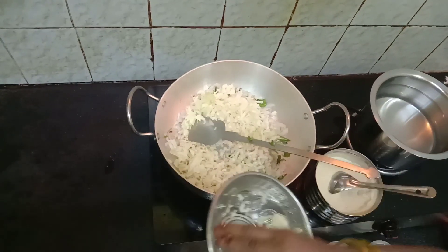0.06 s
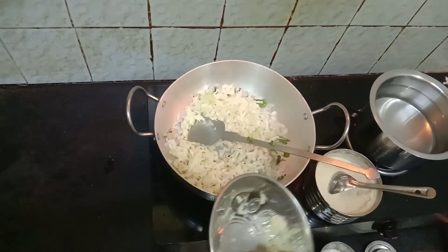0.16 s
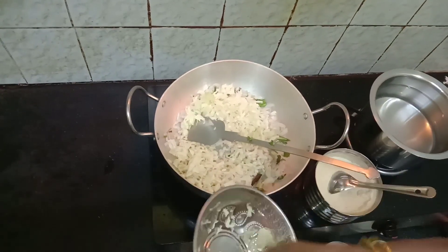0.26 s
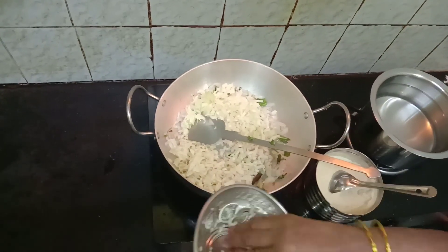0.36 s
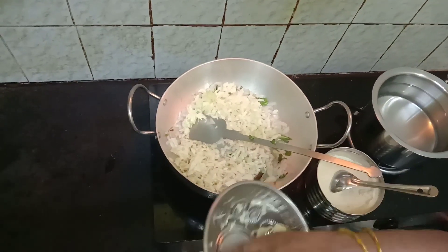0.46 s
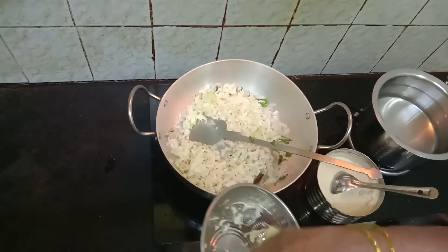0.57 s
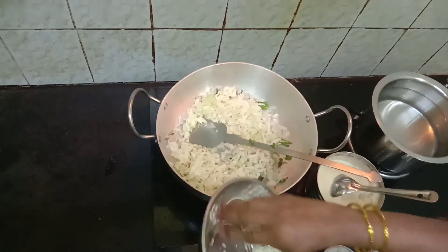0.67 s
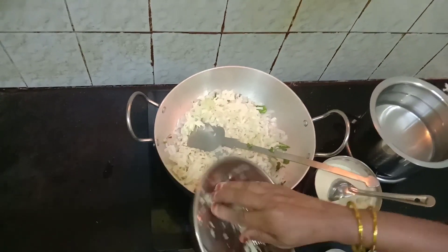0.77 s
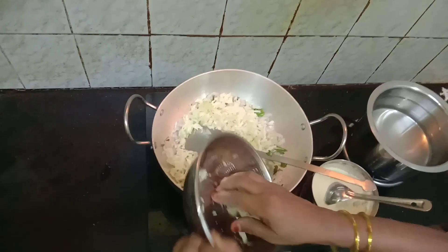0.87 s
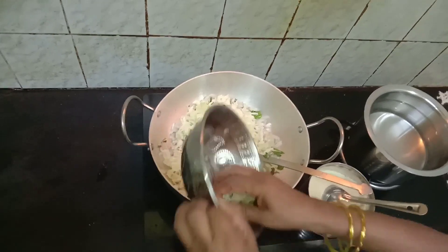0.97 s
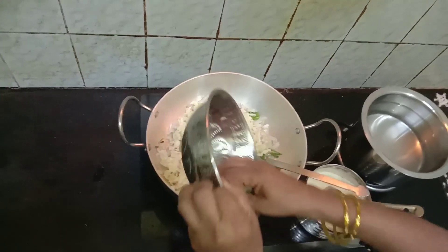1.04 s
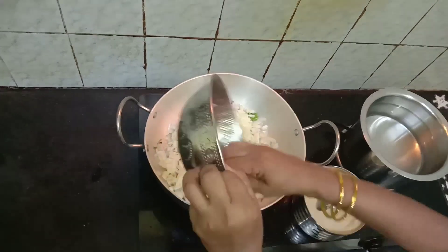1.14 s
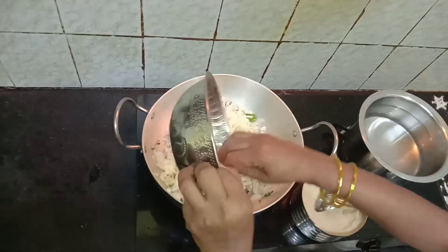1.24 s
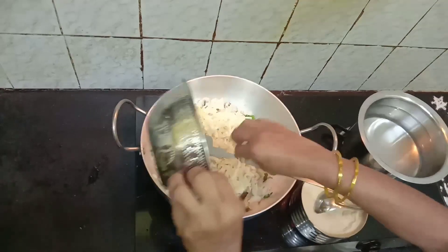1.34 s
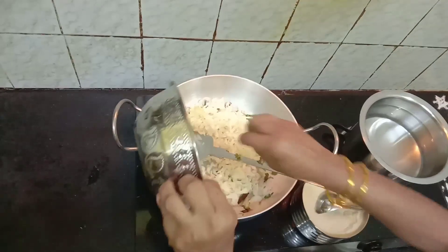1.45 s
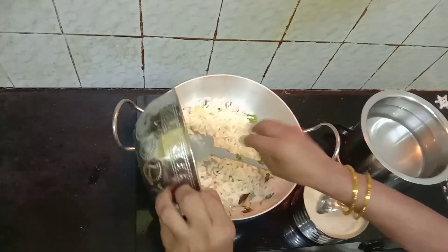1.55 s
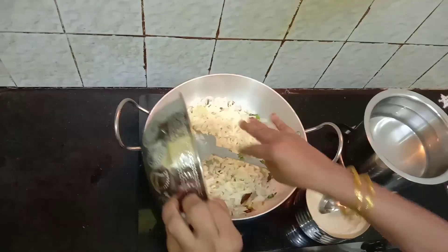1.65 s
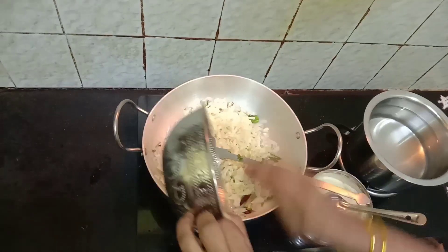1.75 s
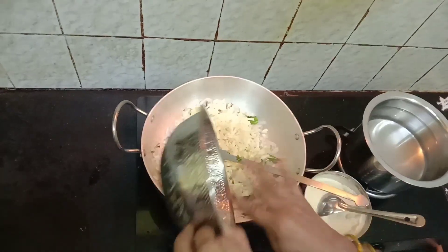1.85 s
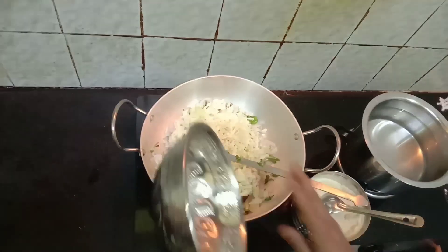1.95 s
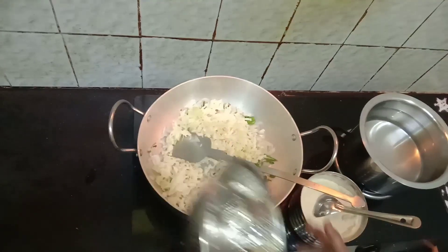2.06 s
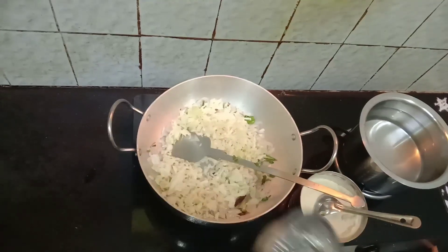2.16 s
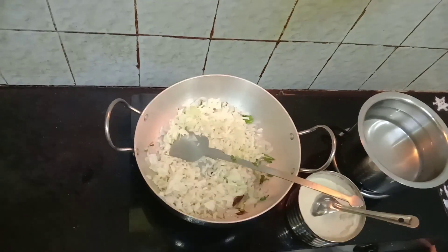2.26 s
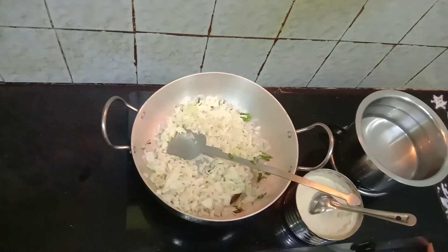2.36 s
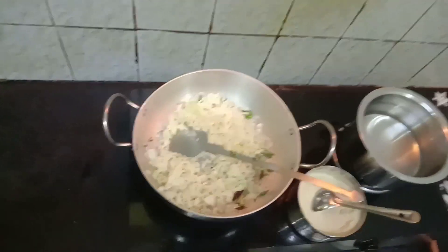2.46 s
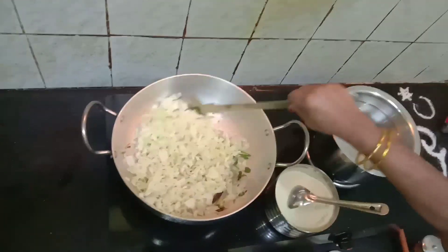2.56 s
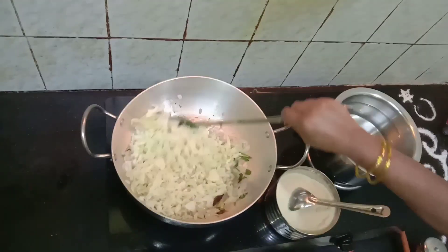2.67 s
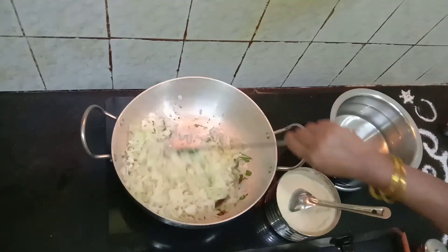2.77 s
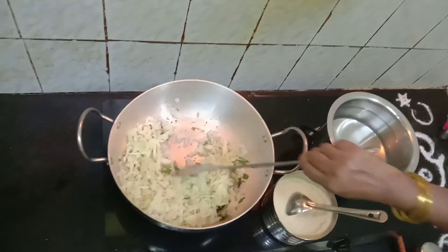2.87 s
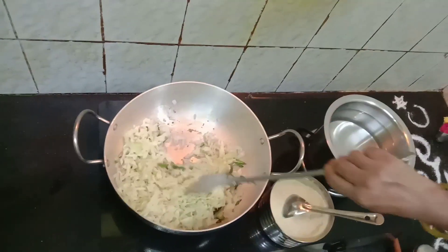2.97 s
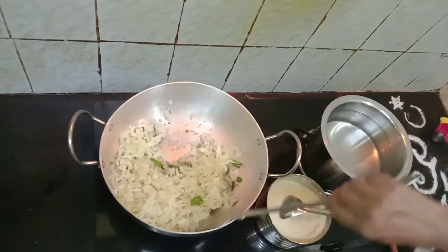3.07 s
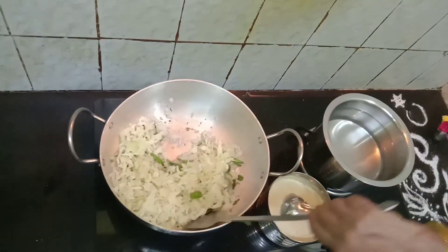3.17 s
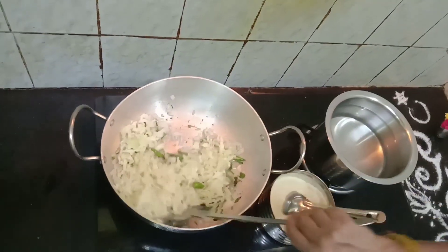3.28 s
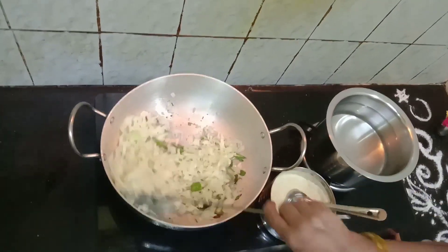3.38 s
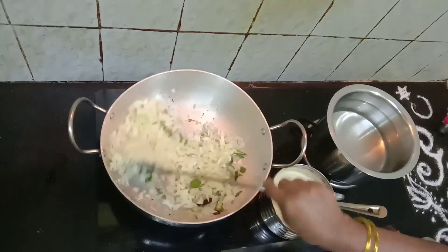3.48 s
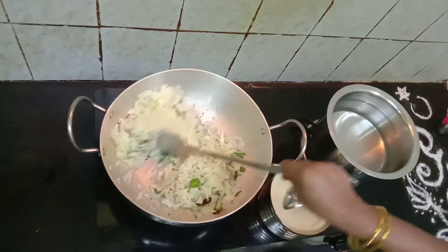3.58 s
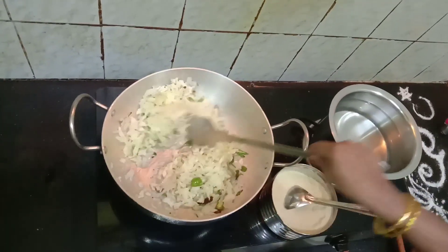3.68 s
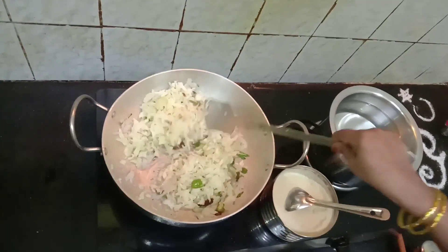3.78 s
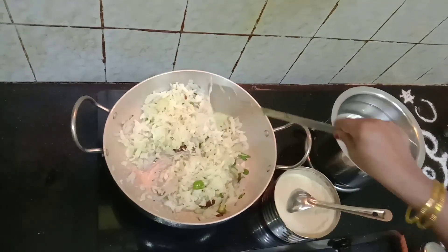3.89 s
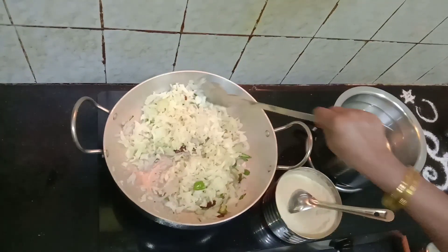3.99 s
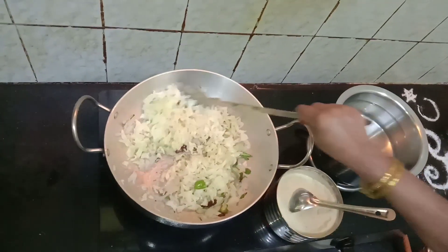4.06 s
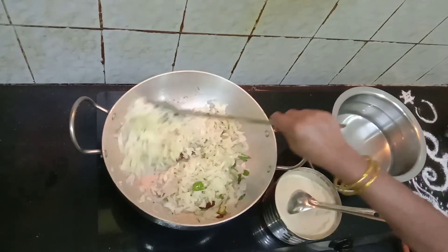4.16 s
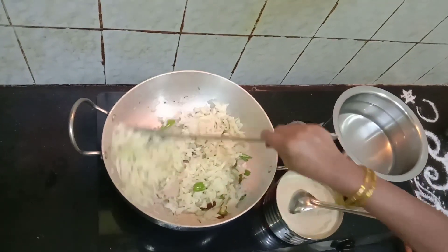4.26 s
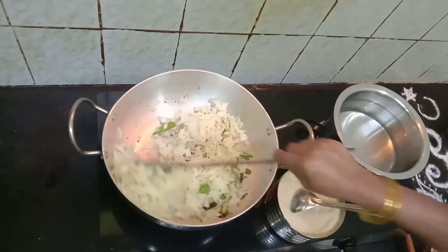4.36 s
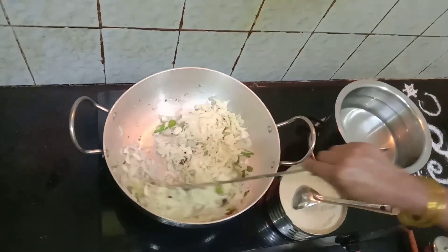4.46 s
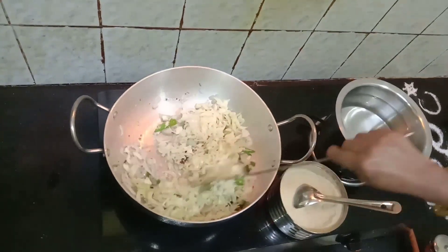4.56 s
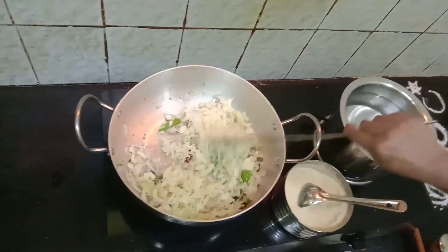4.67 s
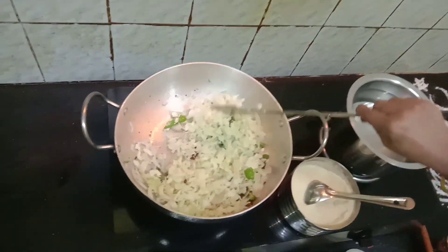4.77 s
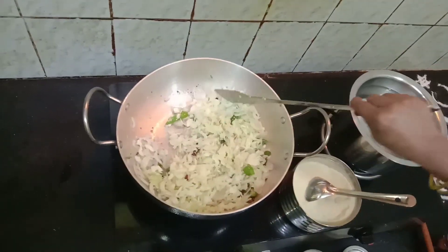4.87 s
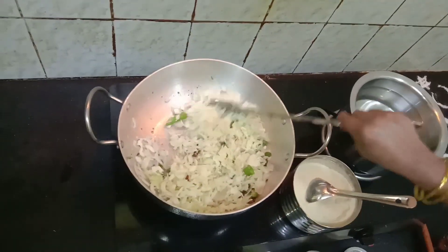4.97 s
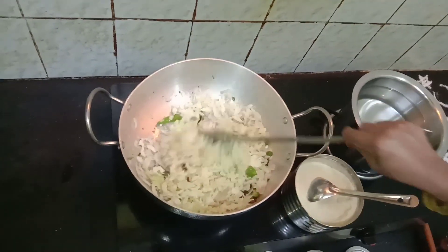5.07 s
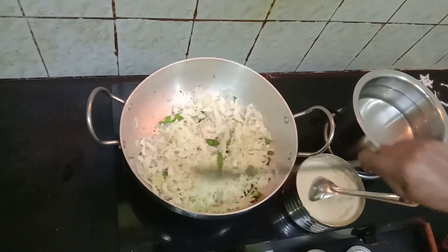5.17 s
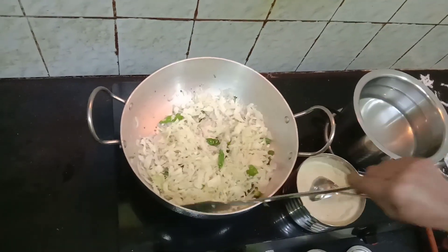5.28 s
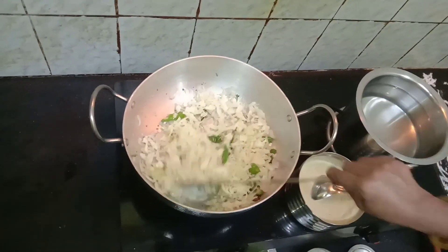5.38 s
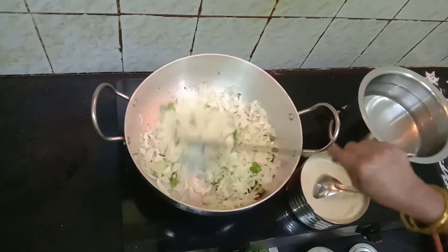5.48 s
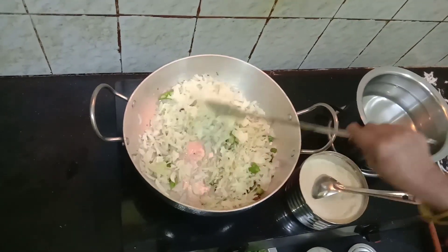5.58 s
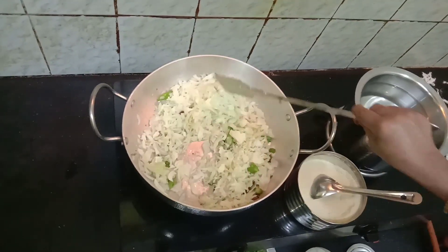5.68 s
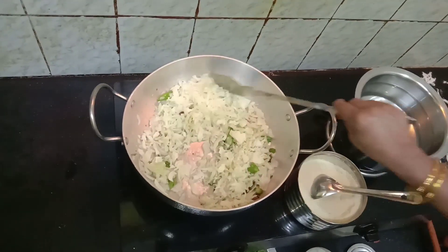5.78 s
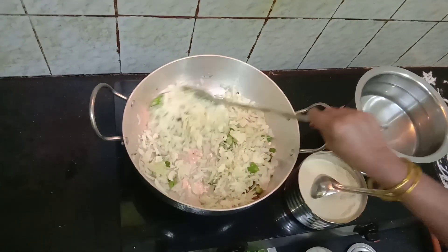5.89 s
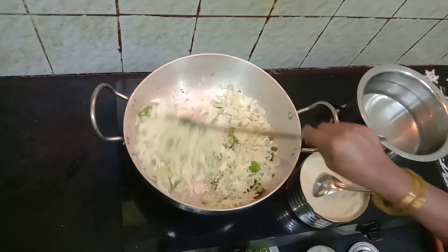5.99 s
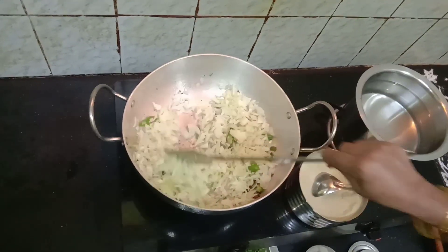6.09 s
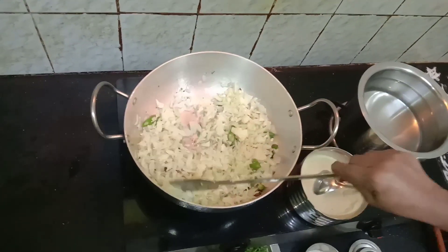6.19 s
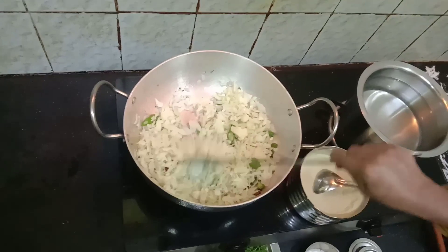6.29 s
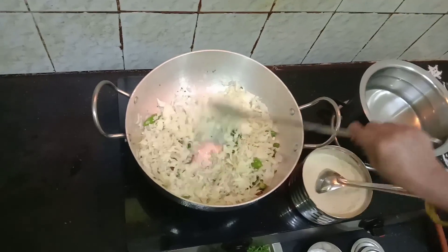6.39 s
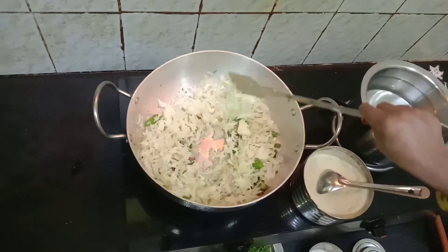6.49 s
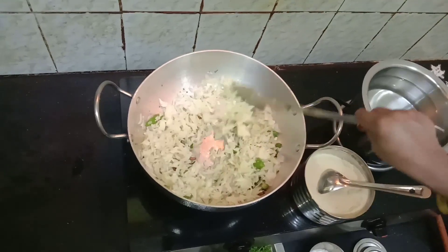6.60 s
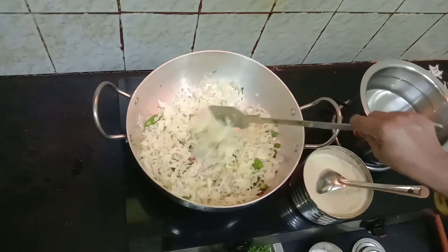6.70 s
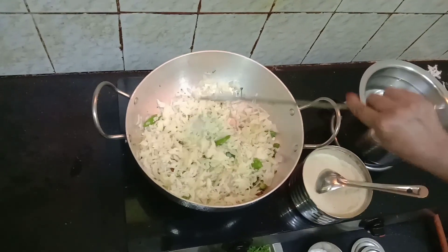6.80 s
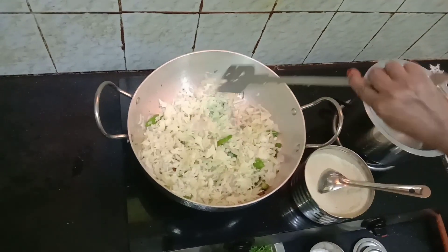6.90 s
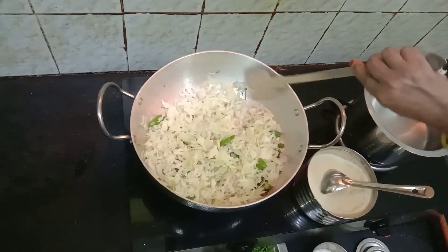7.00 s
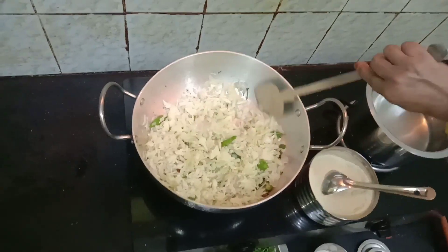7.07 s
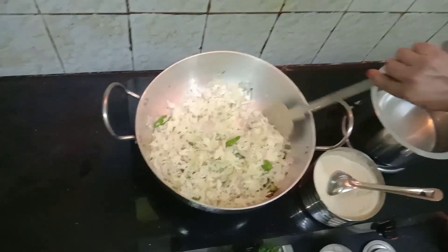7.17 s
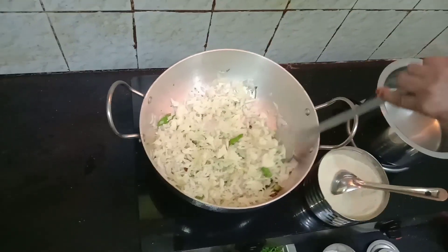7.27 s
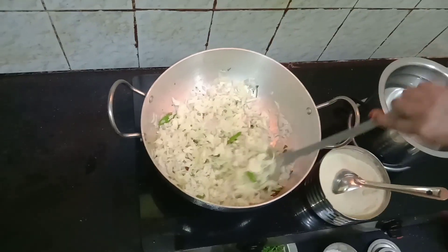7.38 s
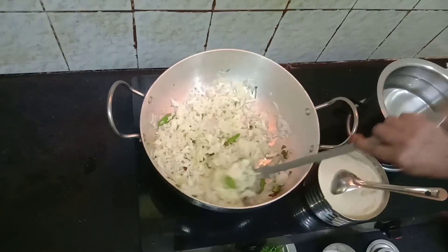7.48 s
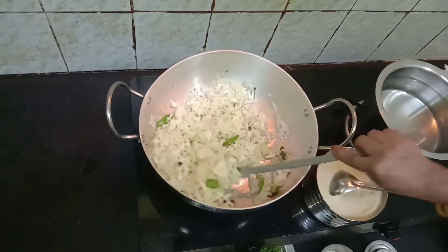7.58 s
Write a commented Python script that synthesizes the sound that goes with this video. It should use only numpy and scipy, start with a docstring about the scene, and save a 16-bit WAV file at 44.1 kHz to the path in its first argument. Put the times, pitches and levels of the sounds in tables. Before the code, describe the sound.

Food sizzles in hot oil while a steel bowl is emptied with light bumps, then a metal spatula clanks and scrapes around the ringing pan.

```python
"""A tiled kitchen: chopped vegetables sizzle in oil in a round metal pan. The oil is made of random
bursts and noise, with louder pops as short bursts of filtered noise. A steel bowl is emptied over the
pan and bangles clink, both built from fading sine tones and noise. After a short silence a metal
spatula lands on the pan again and again and scrapes through the food: many small contacts ring the
modes of pan and blade. Room rumble lies underneath, joined by a low hum after the silence."""
import sys
import numpy as np
from scipy import signal
from scipy.fft import rfft, irfft, next_fast_len
from scipy.io import wavfile
from scipy.ndimage import map_coordinates

SR = 44100
rng = np.random.default_rng(int(sys.argv[2]) if len(sys.argv) > 2 else 0)


def inscribe(sig):
    """Save sig as 16-bit PCM at rate SR to the path in sys.argv[1].

    A 1-D sig is mono; a 2-D sig holds one channel per row.
    Samples are clipped to [-1, 1] before scaling.
    """
    pcm = np.round(np.clip(np.atleast_2d(sig).T, -1, 1) * 32767)
    wavfile.write(sys.argv[1], SR, pcm.astype(np.int16))


N = 336924
TIME = np.arange(N) / SR
PAUSE_START_S, PAUSE_END_S = 2.358, 2.484  # the short silence


def amp(db):
    """Turn decibels into an amplitude factor."""
    return 10 ** (np.asarray(db) / 20)


def unit(x):
    """Scale a sound to an RMS level of one."""
    return x / np.sqrt(np.mean(x ** 2) + 1e-20)


def along(points, hz):
    """Read a curve of (frequency, value) points on a logarithmic frequency axis."""
    f, v = np.transpose(points)
    return np.interp(np.log(hz + 1), np.log(f + 1), v)


def curves(rows):
    """Draw straight lines between the rows: one value per sample for each column after the time."""
    s, *cols = np.transpose(rows)
    return [np.interp(TIME, s, c) for c in cols]


def wobble(rate):
    """A smooth random curve with rate knots a second."""
    knots = rng.standard_normal(int(N * rate / SR) + 4)
    return map_coordinates(knots, [TIME * rate])


def swell(s, width, db):
    """A bell-shaped rise or dip in dB around time s; width is half its spread in seconds."""
    return db * np.exp(-((TIME - s) / width) ** 2)


def colour(x, gain):
    """Filter a sound so that each frequency is scaled by gain(Hz), with no echo ahead of the sound."""
    m = 2 * next_fast_len(len(x) // 2 + 4096)
    log_gain = np.log(np.maximum(gain(np.fft.rfftfreq(m, 1 / SR)), 1e-6))
    # folding the cepstrum gives a minimum-phase filter
    cepstrum = irfft(log_gain, m)
    cepstrum[1:m // 2] *= 2
    cepstrum[m // 2 + 1:] = 0
    response = np.exp(rfft(cepstrum))
    return irfft(rfft(x, m) * response, m)[:len(x)]


def band(x, lo_hz, hi_hz, order=3):
    """Keep the frequencies between two edges."""
    edges = np.clip([lo_hz, hi_hz], 10, SR / 2 - 100)
    return signal.sosfilt(signal.butter(order, edges, 'band', fs=SR, output='sos'), x)


def add(track, s, sound):
    """Mix a sound into the track at time s."""
    part = track[max(0, round(s * SR)):][:len(sound)]
    part += sound[:len(part)]


def ticks(rate, spread_db):
    """Random clicks, rate a second on average, of varied size and either sign."""
    size = amp(spread_db * np.clip(rng.standard_normal(N), -2.7, 2.7))
    return (rng.random(N) < rate / SR) * size * np.sign(rng.standard_normal(N))


def ring(modes, t, scatter_db):
    """Sum of fading sine tones whose strengths vary with each touch."""
    out = 0
    for hz, db, t60 in modes:
        level_db = db + rng.normal(0, scatter_db) - 60 * t / t60
        out = out + amp(level_db) * np.sin(2 * np.pi * hz * t)
    return out


def kitchen(x, wet_db):
    """Direct sound plus the answer of the tiled walls, made of noise that fades at its own speed per pitch."""
    # how long the room rings: (frequency [Hz], t60 [s])
    walls = [(150, 0.62), (1000, 0.46), (5000, 0.4), (14000, 0.48)]
    hz, t, z = signal.stft(rng.standard_normal(SR // 2), SR, nperseg=256)
    fade = amp(-60 * t / along(walls, hz)[:, None])
    tail = signal.istft(z * fade, SR, nperseg=256)[1]
    # the walls answer 1/300 s late
    tail = np.pad(tail / np.linalg.norm(tail), (SR // 300, 0))
    return x + amp(wet_db) * signal.fftconvolve(x, tail)[:len(x)]


def sizzle():
    """Countless steam bubbles burst in the oil: larger ones bubble in the pan, tiny ones hiss and fizz."""
    # how hard the oil fries, before and after the silence: (time [s], hiss level [dB], top fizz level [dB])
    frying = [
        [(0.0, -41.5, -53), (0.33, -43, -51), (0.51, -43.5, -55), (0.89, -42, -53), (1.27, -43.5, -53),
         (1.8, -43, -53), (2.14, -43.5, -51)],
        [(2.74, -42, -51), (3.65, -39, -49.5), (4.08, -37.5, -49), (4.49, -40.5, -49.5), (6.47, -39, -48.5),
         (6.75, -39.5, -43.5), (7.64, -39.5, -50)],
    ]
    # colour of the frying oil: (frequency [Hz], level [dB per Hz])
    oil_colour = [(250, -24), (850, -22), (1250, -15), (1550, -18), (2200, -19), (2900, -12), (3900, -4.5),
                  (5000, -3), (6200, 1.5), (6600, -5), (7200, 0.5), (8200, -11), (10500, -17), (13800, -25)]
    # air in the pan and the dishes around it: (frequency [Hz], width [Hz], boost [dB])
    hollows = [(590, 27, 6.5), (980, 23, 7.5), (1250, 64, 11), (1583, 58, 3.5), (2220, 250, 6),
               (2970, 87, 1.5), (3520, 84, 0.5)]
    bubbling_db, bubbling_follows = -55, .4  # the larger bubbles follow the hiss only in part
    hiss_offset_db, fizz_offset_db = -0.5, 5  # relative to the frying table
    flurry_db = .8

    frying_db, fizz_db = curves(np.vstack(frying))
    bursts = unit(ticks(3500, spread_db=4.0)) + amp(1.5) * rng.standard_normal(N)
    surge_db = flurry_db * (wobble(6.6) + wobble(35))  # the bubbles come in flurries
    bursts = kitchen(bursts, wet_db=-10.5) * amp(surge_db)

    def hollow_db(f):
        """Boost of the air resonances, strongest at each centre."""
        return sum(db / (1 + (2 * (f - hz) / width) ** 2) for hz, width, db in hollows)

    oil = colour(bursts, lambda f: amp(along(oil_colour, f) + hollow_db(f)))
    bubbling = band(oil, 188, 3250, order=5)
    bubbling = bubbling / np.std(band(bubbling, 1260, 3800))
    tipping_db = swell(0.92, 0.12, 5)  # the bubbling swells while the bowl is tipped
    follow_db = bubbling_follows * (frying_db - frying_db.mean())
    bubbling = bubbling * amp(bubbling_db + follow_db + tipping_db + 0.39 * wobble(12))
    hiss = unit(band(oil, 3790, 20000, order=4)) * amp(frying_db + hiss_offset_db)
    fizz = unit(band(bursts, 14700, 17100, order=3))
    fizz = fizz * amp(fizz_db + fizz_offset_db + 1.1 * wobble(12))
    return bubbling + hiss + fizz


def background():
    """Room rumble from filtered noise, and a wavering low hum after the silence that swells once and fades."""
    # colour of the room rumble: (frequency [Hz], level [dB per Hz])
    air = [(15, -116), (25, -44), (43, -19), (83, 4), (151, 5), (271, -3.5), (315, -21.5), (730, -8.5),
           (900, -16), (1170, -54), (1980, -120)]
    early_rumble_db, stirring_rumble_db = -67.5, -62.5  # before and after the silence
    hum_base_db, hum_end_s, hum_fade_db_per_s = -61, 5.75, 7

    stirring = TIME > PAUSE_END_S
    rumble = unit(colour(rng.standard_normal(N), lambda f: amp(along(air, f))))
    rumble_db = np.where(stirring, stirring_rumble_db, early_rumble_db) + 2.3 * wobble(5.9)
    hum_hz = 149 * (1 + .02 * wobble(12))
    hum = unit(np.sin(2 * np.pi * np.cumsum(hum_hz) / SR) * amp(3.2 * wobble(7.3)))
    hum_db = hum_base_db + swell(3.59, 0.3, 13.6)
    hum_db = hum_db - hum_fade_db_per_s * np.maximum(TIME - hum_end_s, 0)
    return rumble * amp(rumble_db) + hum * amp(hum_db) * stirring


def pops():
    """Single drops of water spit in the oil as short noise bursts: a few loud ones, smaller ones at random."""
    # the loudest bursts of oil: (time [s], level before a fixed boost [dB], centre [Hz])
    loud = [(0.1198, -30, 6400), (2.0289, -31.5, 6000), (3.905, -19.5, 5200), (4.45, -27.5, 5900),
            (4.6341, -36.5, 2690), (4.7548, -30, 6250), (6.571, -31, 6200), (6.7615, -30.5, 4660)]
    small_count, small_db, small_hz = 12, -36, 6100  # level before the same boost, centre before scatter
    boost_db, pop_t60_s = 6.0, .02

    out, t = np.zeros(N), np.arange(SR // 4) / SR
    small = []
    for _ in range(small_count):
        s = rng.random() * N / SR
        small.append((s, small_db + rng.normal(0, 2), small_hz * np.exp(rng.normal(0, 0.18))))
    for s, db, hz in loud + small:
        noise = rng.standard_normal(len(t)) * amp(-60 * t / pop_t60_s)
        snap = band(noise, hz * 0.86, hz * 1.32, order=3)
        snap = snap / np.abs(snap).max()
        add(out, s, kitchen(amp(db + boost_db) * snap, wet_db=-2.5))
    return out


def bowl():
    """The hand bumps and wipes the steel bowl: fading noise for the touch, short tones for the steel."""
    # how it is handled: (time [s], level [dB], centre [Hz], width [octaves], t60 [s])
    bumps = [(0.357, -41.5, 161, 0.8, 0.096), (0.689, -46.5, 1500, 4.4, 0.22),
             (0.777, -44, 1620, 0.11, 0.11), (0.825, -49, 900, 6.1, 0.16), (0.92, -31, 5800, 0.79, 0.047),
             (0.924, -38, 800, 7.4, 0.09), (1.034, -40, 3020, 0.49, 0.18)]
    # tones of the steel: (frequency [Hz], relative level [dB], t60 [s])
    steel_modes = [(1620, -30, .15), (2730, 1, 0.21), (3250, -2, 0.25), (4850, 3, 0.13), (6360, 9, 0.14)]
    out, t = np.zeros(N), np.arange(SR // 3) / SR
    for s, db, hz, octaves, t60 in bumps:
        half_width = 2 ** (octaves / 2)
        touch = band(rng.standard_normal(len(t)), hz / half_width, hz * half_width, order=2)
        hardness = min(hz / 2000, 1)  # soft thuds hardly wake the steel
        steel = amp(-14.0) * hardness * ring(steel_modes, t, scatter_db=4)
        bump = unit(touch) * amp(-60 * t / t60) + steel
        add(out, s, amp(db) * kitchen(bump, wet_db=-11.5))
    return out


def bangles():
    """Thin metal rings touch on the wrist: a tick of bright noise and a few high, fading tones."""
    # when they touch: (time [s], level before a 1 dB cut [dB])
    clinks = [(1.575, -42.5), (1.912, -44), (2.0629, -39), (5.3455, -40), (5.6176, -42), (6.019, -43),
              (6.1986, -38), (6.4033, -43)]
    # tones of the rings: (frequency [Hz], relative level [dB], t60 [s])
    bangle_modes = [(5150, -32, 0.12), (6840, 3.5, 0.11), (10200, -1.5, 0.049), (11600, -4, 0.08),
                    (12970, -9, 0.07), (12990, -2, 0.14)]
    out, t = np.zeros(N), np.arange(SR // 3) / SR
    for s, db in clinks:
        tick = band(rng.standard_normal(len(t)), 5000, 15000) * amp(-60 * t / 0.022)
        clink = ring(bangle_modes, t, scatter_db=3.0) + amp(1) * tick
        add(out, s, kitchen(amp(db - 1) * clink, wet_db=-5))
    return out


def metal(damping, sheet_db, sheet_t60, crack_db, spot_hz, spot_db):
    """Answer of the metal to one contact: modes over a dense, short clash, favoured around spot_hz."""
    # modes of pan and spatula: (frequency [Hz], relative level [dB], t60 before damping [s])
    metal_modes = [(93.6, -14.5, 0.37), (199.8, -14.5, 0.66), (319.6, -1, 0.19), (568, -8, 0.26),
                   (619.7, 1, 0.27), (657.6, 7.5, 0.091), (1011, -2.5, 0.34), (1298, 2, 0.087),
                   (1472, -7, 0.088), (1754, -15.5, 0.33), (1978, -9, 0.22), (2436, -15, 0.48),
                   (2770, -5.5, 0.066), (3118, -4, 0.11), (3900, -33, 0.24), (4444, 8.5, 0.058),
                   (4695, 12.5, 0.025), (4800, -22, .17), (5200, 9.5, 0.03), (5720, -1, 0.14),
                   (5960, 10, 0.072), (5800, -31, 0.12), (6480, 0, 0.13), (6820, 12, 0.043),
                   (7340, -17, 0.091), (7500, 1, 0.048), (8500, -9.5, 0.12)]
    # dense, short-lived vibration of the loaded pan: (frequency [Hz], level [dB per Hz])
    sheet = [(40, -11), (90, -23), (210, -12), (400, -5.5), (600, 3.5), (820, -6.5), (1200, -4), (1700, -7),
             (3000, -10.5), (5500, 0), (7200, -9.5), (8300, -11), (12000, -25.5), (16000, -22)]
    t = np.arange(SR // 2) / SR

    def favour_db(f):
        """Boost around the pitch favoured by the spot."""
        return spot_db * np.exp(-(np.log((f + 1) / spot_hz) / 0.35) ** 2)

    hz, db, t60 = np.transpose(metal_modes)[:, :, None]
    strength_db = db + favour_db(hz) + rng.normal(0, 2.43, hz.shape)
    tones = np.sin(2 * np.pi * (hz * t + rng.random(hz.shape)))
    modes = amp(strength_db - 60 * t * damping / t60) * tones
    clash = rng.standard_normal(len(t)) * amp(-60 * t / sheet_t60)
    clash[0] += amp(crack_db) * np.linalg.norm(clash)  # a sharp crack at the start
    clash = colour(clash, lambda f: amp(along(sheet, f) + favour_db(f)))
    return unit(modes.sum(0)) + amp(sheet_db) * unit(clash)


def rubbing(count, centre_hz):
    """Stick and slip over the pan; the blade keeps reaching new spots, each with its own answer."""
    slips_per_s, slip_spread_db = 2200, 3.5
    size = SR // 8
    out = np.zeros(count + SR)
    # overlapping stretches fade into one another
    for start in range(0, count + size // 2, size // 2):
        slips = (rng.random(size) < slips_per_s / SR) * amp(rng.normal(0, slip_spread_db, size))
        slips = slips * np.sign(rng.standard_normal(size))
        answer = metal(damping=1.4, sheet_db=4.5, sheet_t60=0.029, crack_db=-2.0,
                       spot_hz=centre_hz, spot_db=2)
        stretch = unit(slips) * signal.windows.cosine(size)
        add(out, start / SR, signal.fftconvolve(stretch, answer))
    return kitchen(out, wet_db=-4.0)[size // 2:][:count]


def scrapes():
    """Each stroke builds up, holds and dies away; it shoves the food dully and rubs the pan into ringing."""
    # pushes through the food: (time [s], rise [s], hold [s], then levels before digging and wavering:
    # food shoved [dB], pan [dB], rasp [dB], blade edge [dB]; centre of its colour [Hz],
    # singing mode relative to the pan [dB])
    strokes = [(2.511, 0.13, 0.051, -44.5, -32.5, -44, -38, 950, -29),
               (3.109, 0.017, 0.14, -46.5, -37.5, -33, -31, 2100, -10),
               (3.30, 0.036, 0.096, -53, -45, -49, -56, 1400, -6),
               (3.577, 0.17, 0.03, -53, -52, -50.5, -49, 800, -12),
               (4.089, 0.033, 0.18, -42.5, -37, -43, -38, 700, -16),
               (4.97, 0.073, 0.05, -43.5, -43, -51.5, -45, 650, -17),
               (5.351, 0.0089, 0.06, -44, -32, -33, -30.5, 1660, -9),
               (5.789, 0.074, 0.048, -46, -34.5, -43, -36.5, 950, -15),
               (5.999, 0.0059, 0.014, -41.5, -44, -47, -52, 804, -21),
               (6.265, 0.008, 0.056, -41.5, -28, -41, -37, 1300, -17),
               (7.04, 0.016, 0.083, -48.5, -40.5, -50, -24.5, 1370, 8),
               (7.111, 0.063, 0.22, -55, -40.5, -43, -52, 1700, -1.5),
               (7.39, 0.057, 0.032, -72, -38, -39.5, -34, 1500, -13),
               (7.518, 0.041, .09, -70, -41, -45.5, -47, 1410, 0)]
    # as the blade digs in it shoves more food and its edge is muffled:
    # (food [dB per s], pan [dB per s], rasp [dB per s], blade edge [dB per s])
    digging = (9, -1.5, -19, -40)
    rise_db, release_db_per_s = 11, 120  # a push builds up by this much, and dies away at this speed
    uneven_db, uneven_rate = 2.3, 29.1  # the hand's pressure wavers: depth, knots a second

    out, t = np.zeros(N), np.arange(round(.7 * SR)) / SR
    for s, rise, hold, *levels, centre_hz, sing_db in strokes:
        rub = rubbing(len(t), centre_hz)
        food = band(rub, 67, 412, order=4)
        singing = unit(band(rub, 588, 716, order=2))  # a pan mode sings through the stroke
        pan = unit(band(rub, 533, 1543, order=5)) + amp(sing_db) * singing
        rasp = band(rub, 1670, 3830, order=4)
        edge = band(rub, 4620, 12300, order=4)
        push_db = rise_db * np.minimum(t / rise - 1, 0)
        push_db = push_db - release_db_per_s * np.maximum(t - rise - hold, 0)
        push_db = push_db + uneven_db * wobble(uneven_rate)[:len(t)]
        dug_s = np.clip(t - rise, 0, hold)
        for part, db, dig in zip((food, pan, rasp, edge), levels, digging):
            add(out, s, unit(part) * amp(db + push_db + dig * dug_s))
    return out


def registers(x):
    """Split a blow into the pan's low ring, the middle clank and the blade's bright ring."""
    low = band(x, 80, 1500, order=4)
    middle = band(x, 1550, 3750, order=4)
    bright = band(x, 4100, 16500, order=4)
    return low, middle, bright


def strikes():
    """The blade lands, chatters for a moment and rings together with the pan; one added tone rings on."""
    # the spatula lands: (time [s], pan level [dB], clank level [dB], blade level [dB], chatter [s],
    # pitch favoured by the spot that is hit [Hz], tone that rings on [Hz], its level [dB])
    landings = [(3.1036, -39.5, -31, -20, 0.014, 2200, 4970, -27),
                (3.139, -46, -32, -25, .01, 2270, 3810, -31),
                (3.231, -54, -34, -32, 0.022, 1630, 2390, -55),
                (3.9969, -35, -33, -23.5, 0.013, 7500, 2790, -32.5),
                (4.932, -29.5, -40, -36, 0.0019, 517, 566, -27.5),
                (5.2846, -41.5, -33, -22.5, 0.0064, 7400, 5200, -28),
                (5.356, -31.5, -33, -22, 0.02, 520, 4430, -27),
                (5.783, -34, -39, -27, 0.016, 565, 5200, -44),
                (6.016, -35, -43, -52, 0.0069, 716, 1050, -56),
                (6.267, -24.5, -27, -26, 0.0016, 1740, 5440, -30),
                (6.975, -48, -45, -39.5, 0.0067, 1960, 644, -39.5),
                (7.038, -45, -37.5, -21.5, 0.0071, 6900, 3200, -35),
                (7.416, -40, -44, -37.5, 0.0074, 1390, 629, -33)]
    out, t = np.zeros(N), np.arange(SR // 2) / SR
    for s, *levels, chatter, spot_hz, ring_hz, ring_db in landings:
        contacts = (rng.random(len(t)) < 1500 / SR) * rng.normal(0, 0.42, len(t))
        contacts = contacts * np.exp(-(t / chatter) ** 2)
        contacts[0] = 1
        answer = metal(damping=1.65, sheet_db=-4.5, sheet_t60=0.027, crack_db=-7.5,
                       spot_hz=spot_hz, spot_db=8.5)
        blow = kitchen(signal.fftconvolve(contacts, answer)[:len(t)], wet_db=-2.0)
        for part, db in zip(registers(blow), levels):
            # the level counts over the first 1/35 s
            add(out, s, amp(db) * part / np.std(part[:SR // 35]))
        add(out, s, amp(ring_db - 60 * t / 0.28) * np.sin(2 * np.pi * ring_hz * t))
    return out


def slides():
    """A rough resonance of the blade falls in pitch as its contact runs down the curved wall."""
    # falling scrapes: (time [s], length [s], first pitch [Hz], last pitch [Hz], relative level [dB])
    falls = [(3.137, 0.28, 2235, 1330, -46), (7.035, 0.12, 2820, 2560, -40),
             (7.171, 0.112, 1870, 1700, -43), (7.393, 0.12, 1544, 1290, -35.5)]
    fade_s = 0.038
    out = np.zeros(N)
    for s, length, first_hz, last_hz, db in falls:
        t = np.arange(round(length * SR)) / SR
        hz = first_hz * (last_hz / first_hz) ** (t / length)
        hz = hz * (1 + .02 * wobble(40)[:len(t)])
        phase = 2 * np.pi * np.cumsum(hz) / SR
        # fast random strengths make the tone rough
        voice = wobble(300)[:len(t)] * np.sin(phase) + wobble(300)[:len(t)] * np.cos(phase)
        touching = np.minimum(np.minimum(t, length - t) / fade_s, 1)
        add(out, s, voice * amp(db) * touching)
    return kitchen(out, wet_db=-6)


def scene():
    """Frying and room underneath, with brief dips in level; pops, utensils and bangles on top."""
    # moments when frying and room dip briefly: (time [s])
    dips = [2.056, 3.096, 5.278, 7.031]
    dip_width_s, dip_db = .008, -7
    dips_db = sum(swell(s, dip_width_s, dip_db) for s in dips)
    bed = (sizzle() + background()) * amp(dips_db)
    return (bed + pops() + strikes() + scrapes() + slides() + bowl() + bangles())[None]


def record(dry):
    """The sound drops out for a moment, and a steep filter removes what lies above the band limit."""
    top_hz = 15540
    live = (TIME < PAUSE_START_S) | (TIME > PAUSE_END_S)
    m = next_fast_len(N + SR // 2)
    steep_cut = 1 + (np.fft.rfftfreq(m, 1 / SR) / top_hz) ** 200
    return irfft(rfft(dry * live, m) / steep_cut, m)[:, :N]


dry = scene()
out = record(dry)
inscribe(out)
```